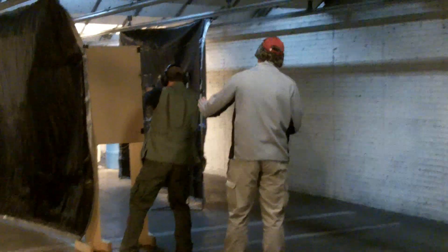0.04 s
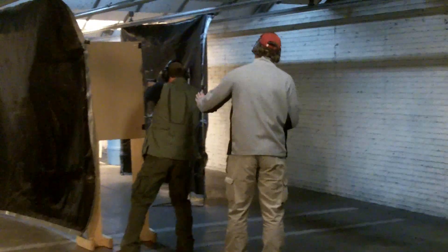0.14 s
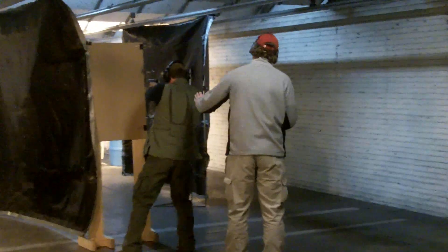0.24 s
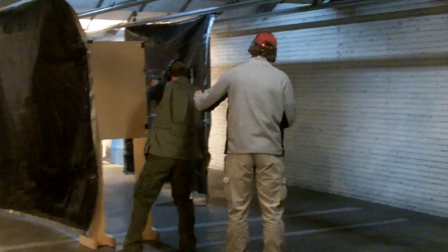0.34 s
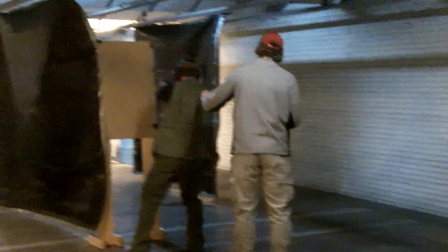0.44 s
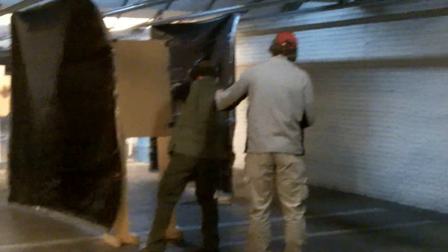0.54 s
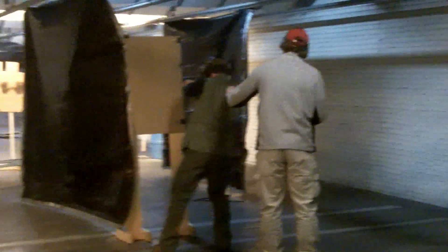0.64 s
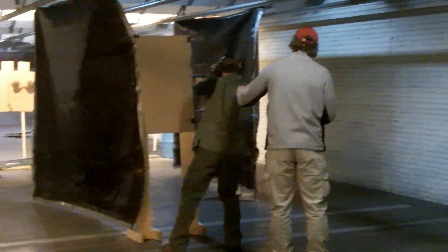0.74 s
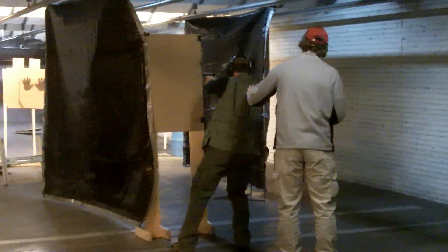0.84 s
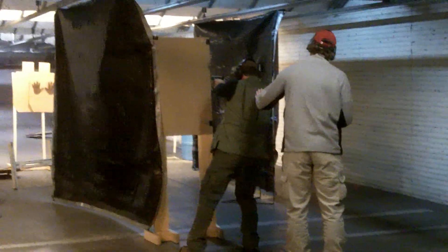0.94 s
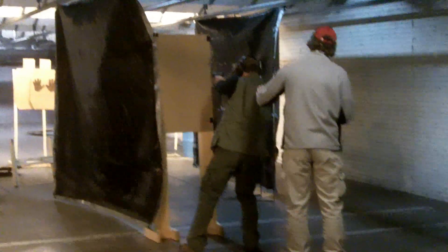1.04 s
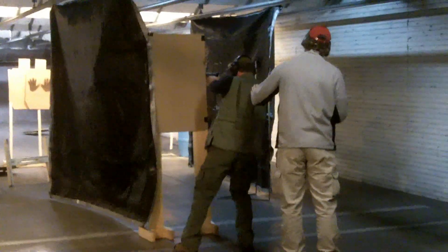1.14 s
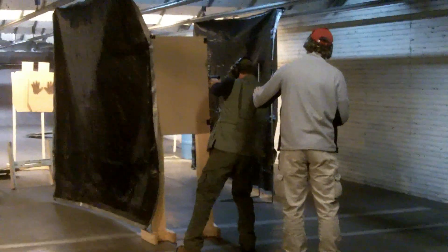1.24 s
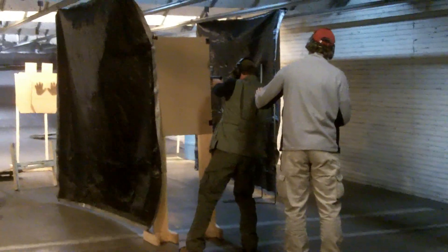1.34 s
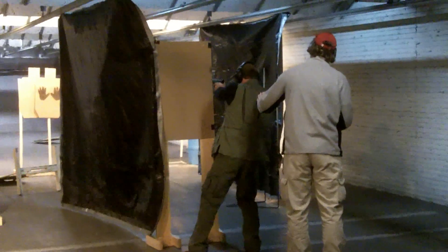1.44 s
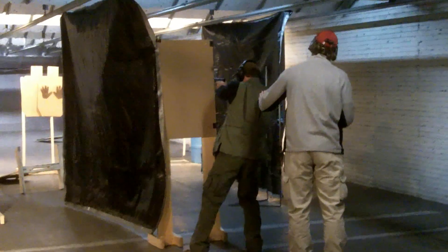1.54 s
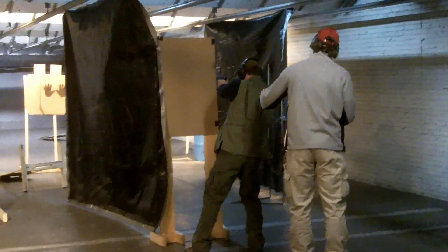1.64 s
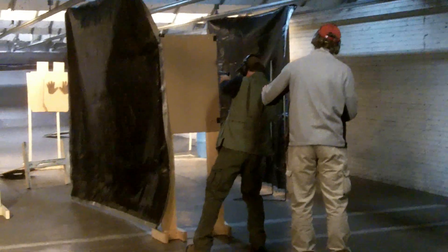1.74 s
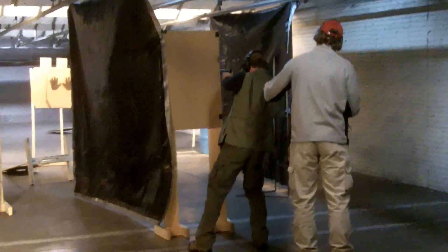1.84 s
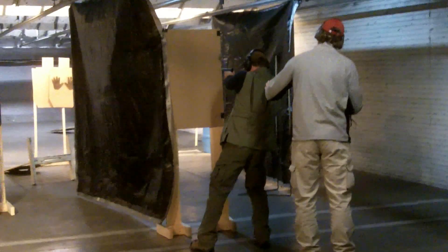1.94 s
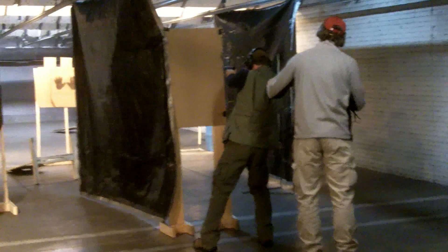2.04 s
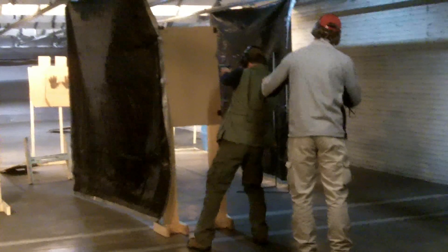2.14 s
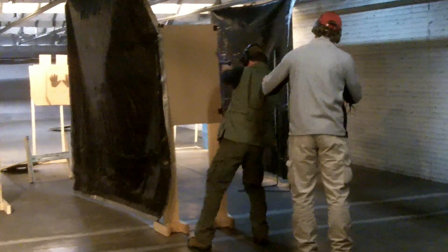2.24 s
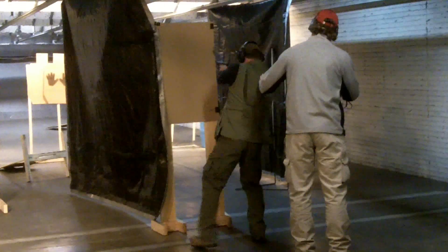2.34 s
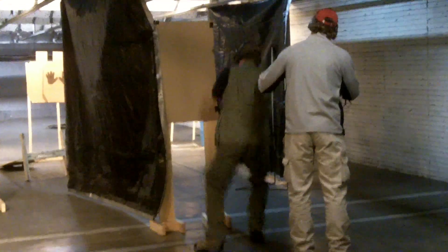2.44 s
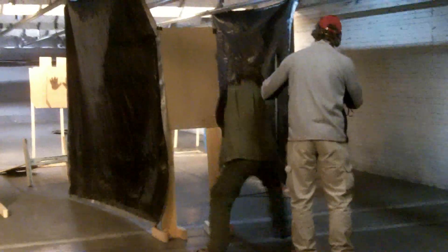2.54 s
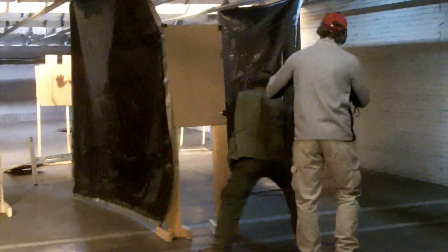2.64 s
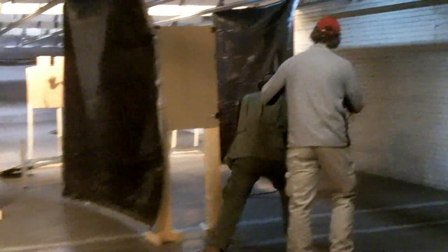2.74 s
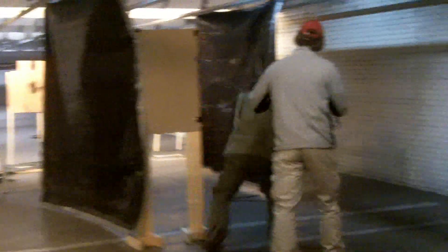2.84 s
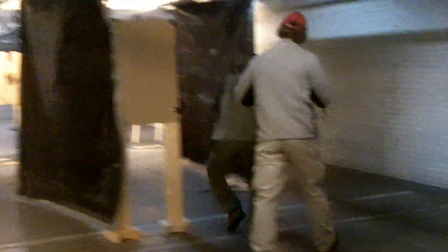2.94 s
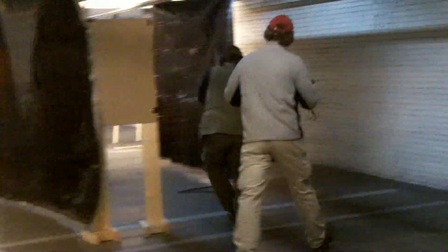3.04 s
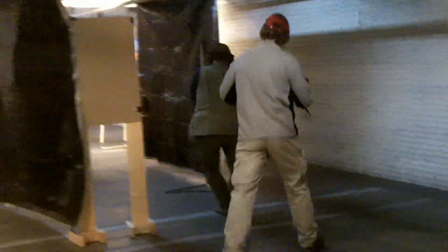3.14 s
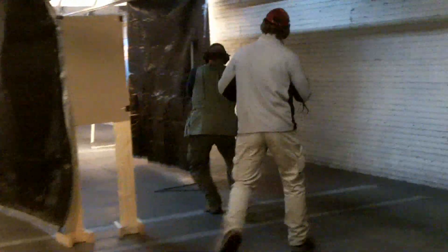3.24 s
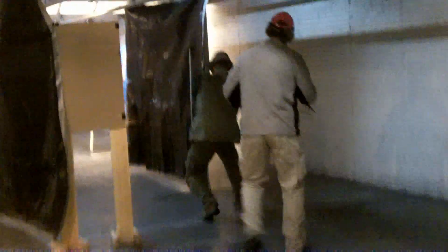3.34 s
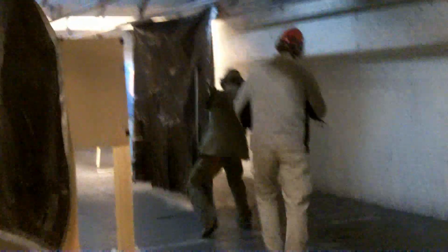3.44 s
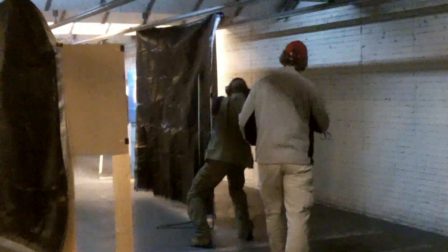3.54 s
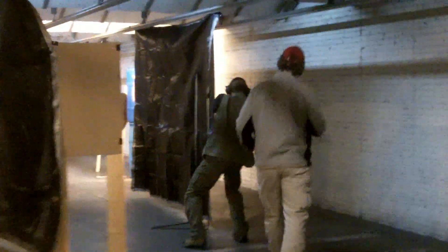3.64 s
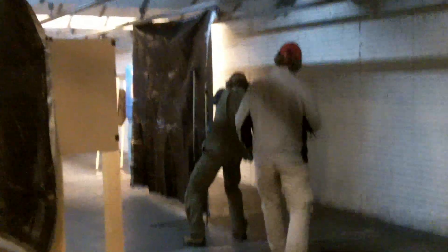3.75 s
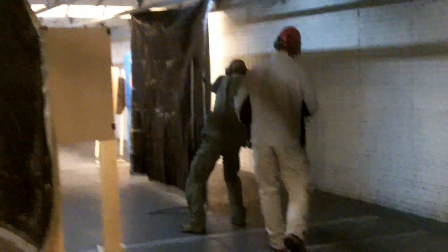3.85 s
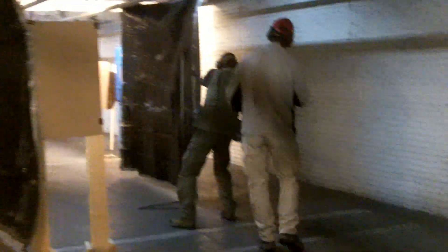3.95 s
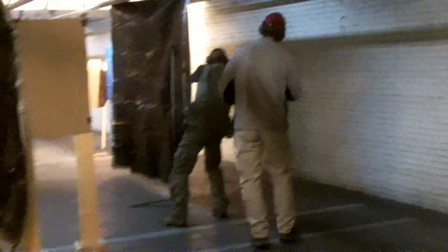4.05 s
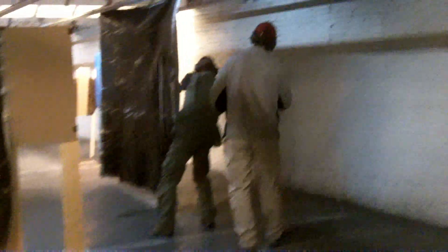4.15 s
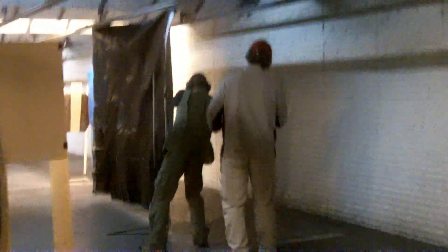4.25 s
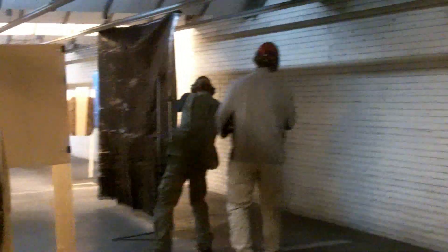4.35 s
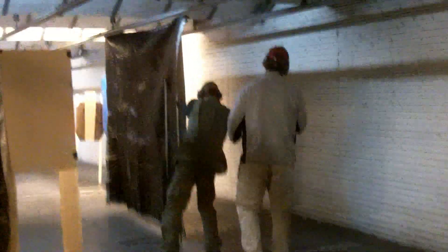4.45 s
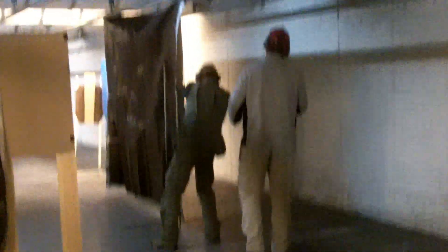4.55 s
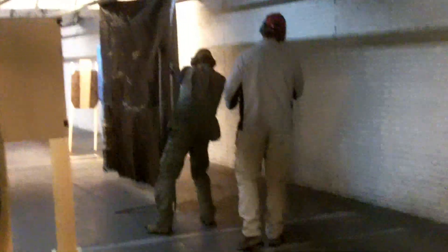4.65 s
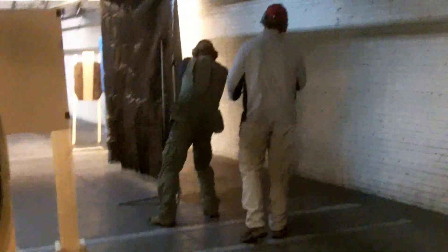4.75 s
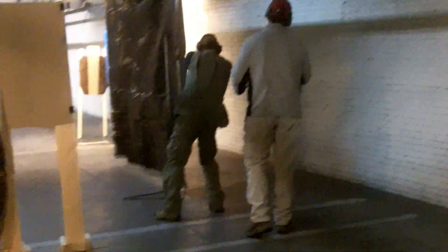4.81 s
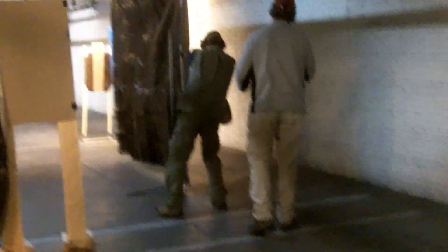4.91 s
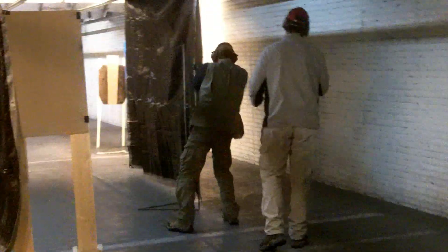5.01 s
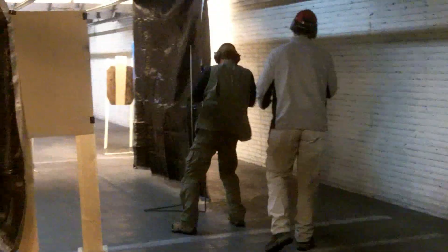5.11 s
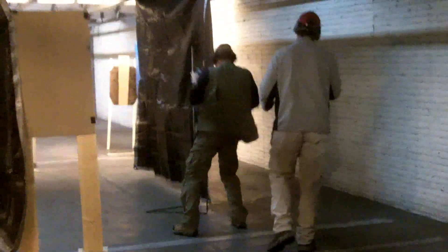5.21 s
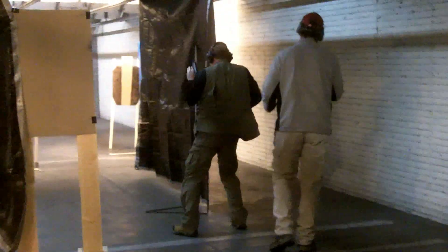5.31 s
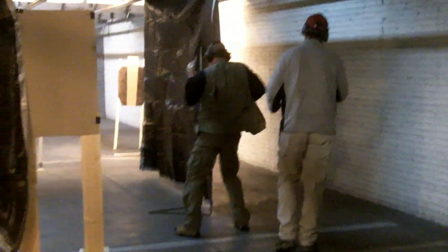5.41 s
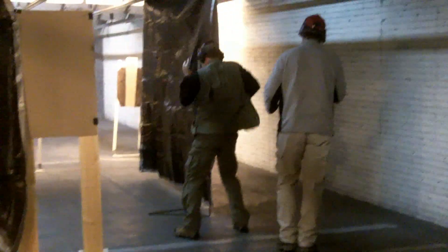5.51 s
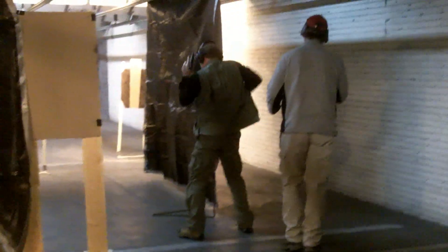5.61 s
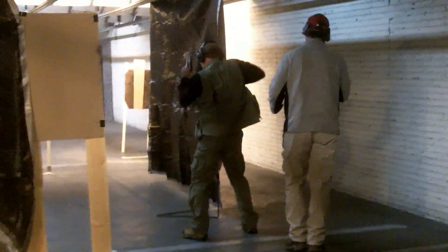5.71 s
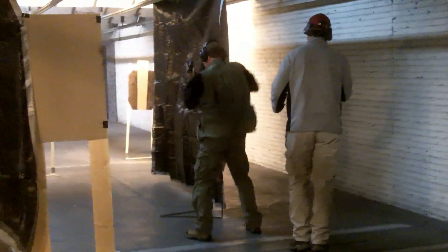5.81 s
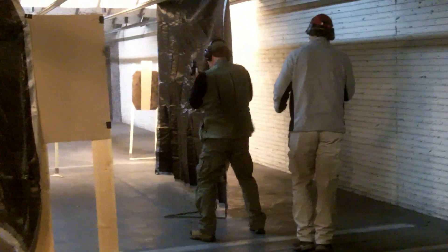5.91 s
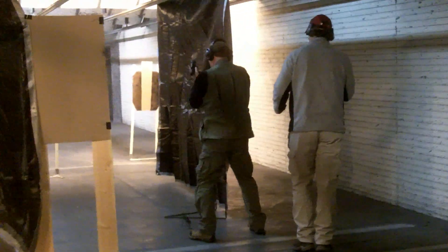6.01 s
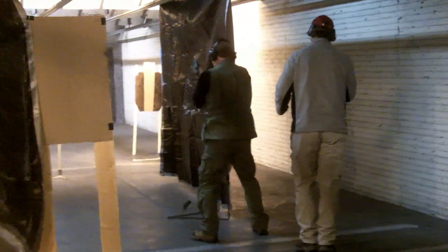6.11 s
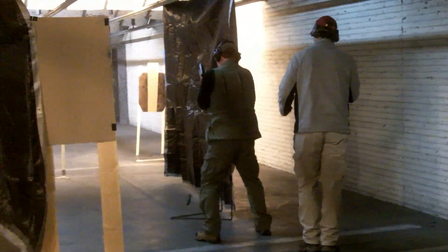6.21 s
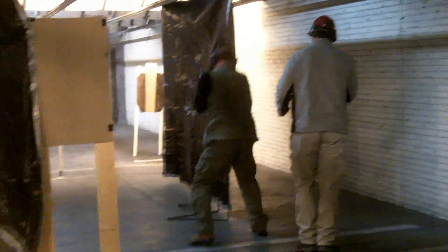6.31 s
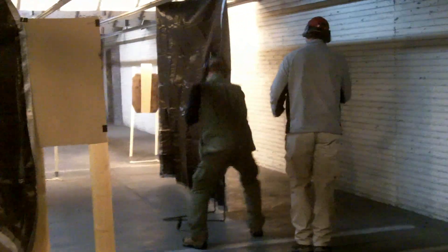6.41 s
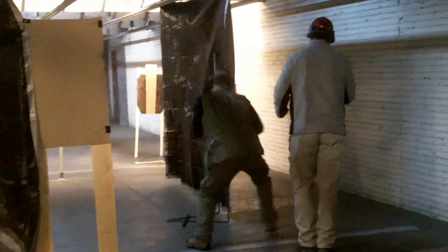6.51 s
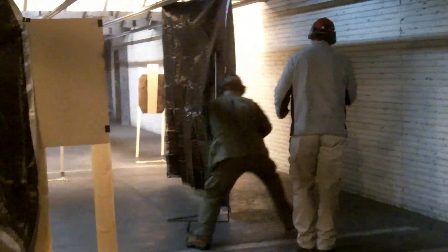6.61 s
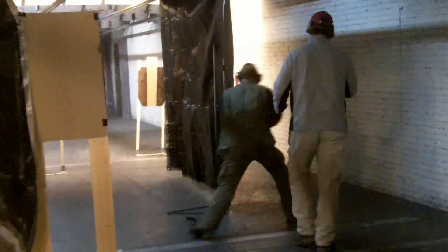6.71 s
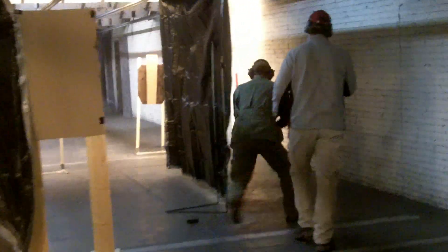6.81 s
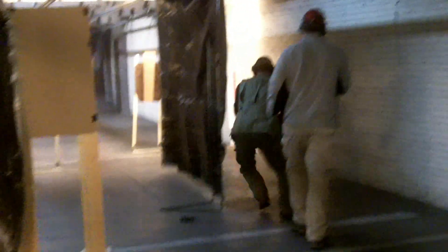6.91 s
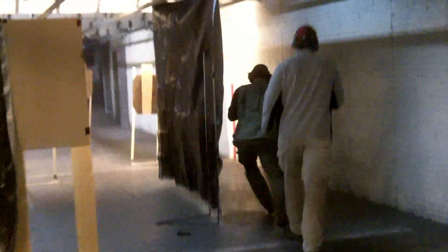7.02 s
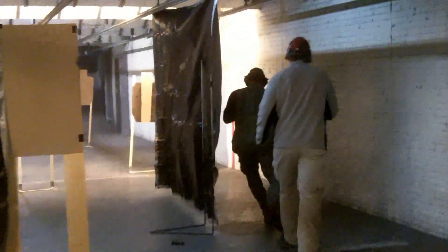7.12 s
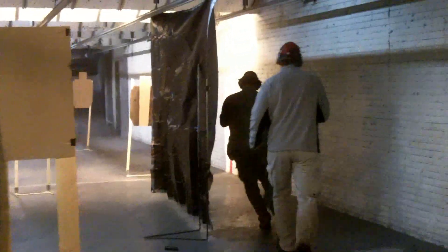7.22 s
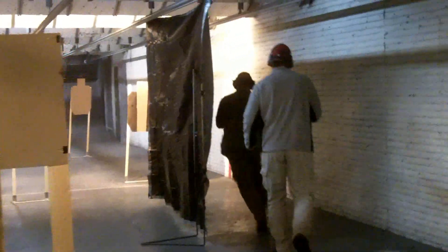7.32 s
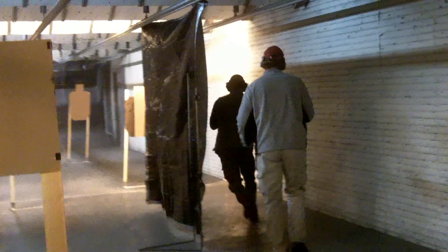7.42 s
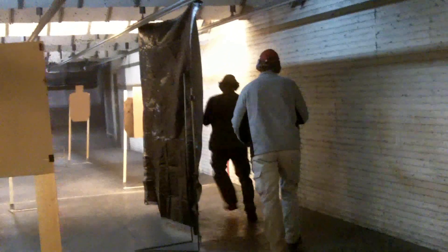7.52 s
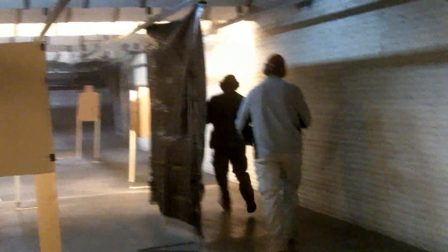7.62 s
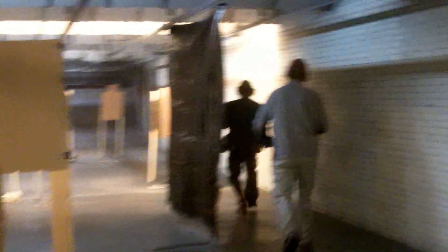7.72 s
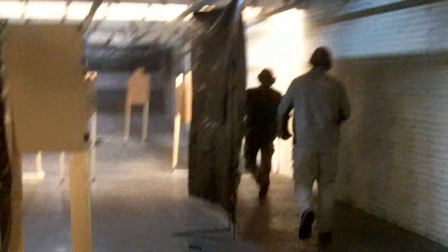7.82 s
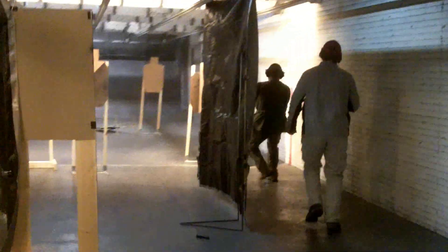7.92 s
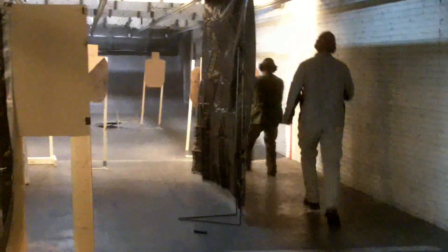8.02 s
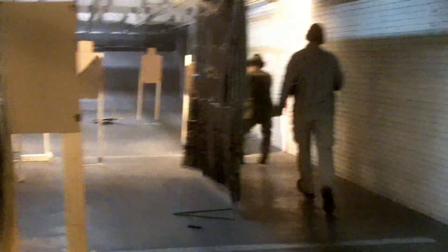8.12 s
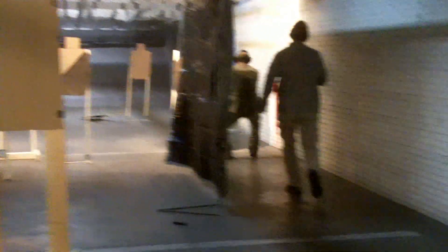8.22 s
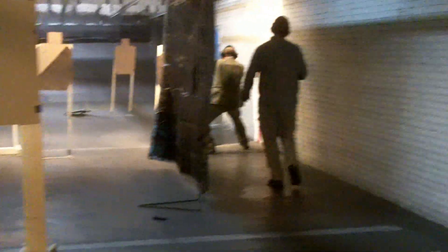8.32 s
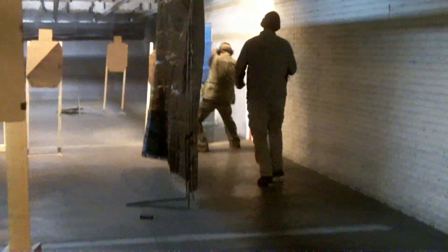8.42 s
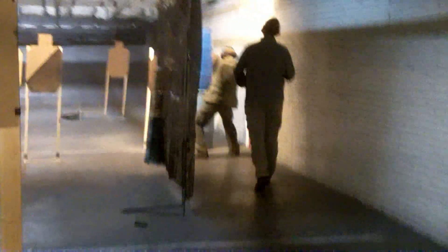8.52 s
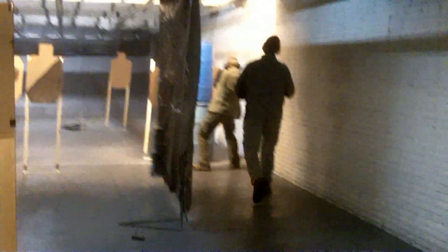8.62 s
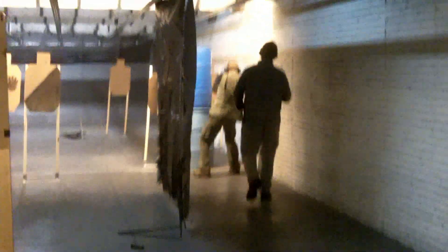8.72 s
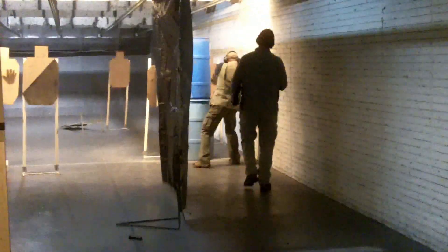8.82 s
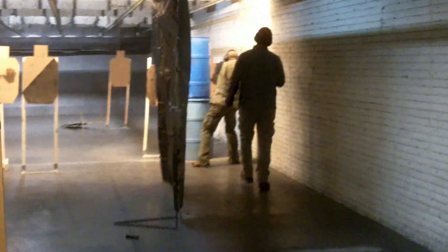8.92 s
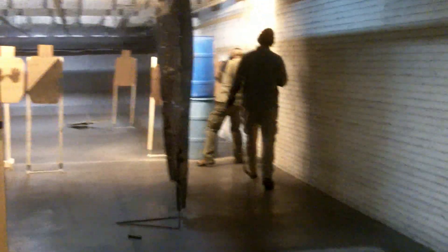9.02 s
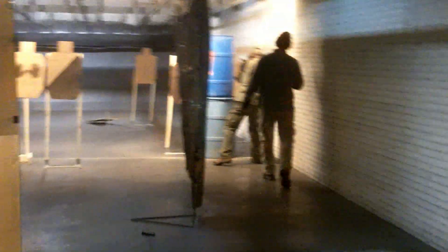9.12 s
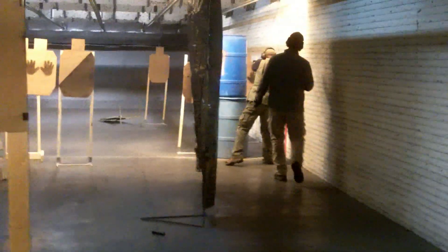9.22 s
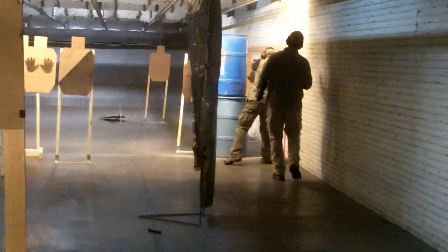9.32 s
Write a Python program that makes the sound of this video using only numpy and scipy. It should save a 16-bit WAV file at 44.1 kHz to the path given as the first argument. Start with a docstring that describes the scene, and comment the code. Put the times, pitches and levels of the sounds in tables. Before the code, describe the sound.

Overloaded pistol blasts in a reverberant hall, brass cases tinkling on concrete, a steel magazine clattering down, footsteps moving off, then a last shot.

```python
"""A pistol fires in a long concrete indoor range, in pairs, a string of three and one last shot at the end.
Each blast is a pressure pulse with echoes and filtered-noise hall decay; the far wall slaps back.
The ventilation is banded noise. Brass cases bounce as noise ticks and paired sines, shoes scuff as noise strokes,
and a magazine dropped in a reload clatters as noise cracks and steel modes. Gain control ducks the loud parts."""
import sys
import numpy as np
from scipy import signal
from scipy.io import wavfile

SR = 44100
rng = np.random.default_rng(int(sys.argv[2]) if len(sys.argv) > 2 else 0)


def master(y):
    """Save y as 16-bit WAV."""
    cut = np.clip(np.atleast_2d(y).T, -1, 1)
    pcm = np.round(cut * 32767)  # scale
    wavfile.write(sys.argv[1], SR, pcm.astype(np.int16))


N = 412776
TIME = np.arange(N) / SR
FAR_WALL_S = .116  # delay of the far-wall slap

# pistol shots: start_s, blast_db, late_tail_db, tilt_db_per_octave (about 1 kHz, hall only)
SHOTS = [(-.052, -2, -0.5, 0.5), (0.498, -3, 0, 1), (1.854, -2.5, 0.5, 1), (2.3678, -1, 0, 0.5),
         (4.332, -1.5, 1, 1), (4.7536, -1, -0.5, 0.5), (5.018, -2, 1.5, 1), (9.2744, -3, -15, 0)]
# hall response, t60 before scaling: freq_hz, early_db_per_hz, early_t60_s, late_db_per_hz, late_t60_s
HALL = [(30, 4.5, 0.68, -9.5, 0.83), (70, 4.5, 0.37, -22, 0.83), (143, 1.5, 0.5, -6.5, 3.2),
        (232, 0, 1.04, -5.5, 2.88), (455, 1, 1.12, -13.5, 2.81), (830, 3, 0.98, -12.5, 2.48),
        (1565, -4.5, 0.91, -17.5, 2.11), (3200, -11.5, 0.85, -30.5, 1.81), (5880, -14, 0.59, -42, 1.6),
        (8730, -25, 0.36, -69.5, 1.27), (15000, -25.5, 0.3, -68.5, .8)]


def from_db(db):
    """Decibels to amplitude gain."""
    return 10 ** (np.asarray(db) / 20)


def rms_one(x):
    """Scale to unit rms."""
    return x / np.sqrt(np.mean(x ** 2) + 1e-20)


def at_hz(rows, hz):
    """Table columns at one frequency, interpolated over log frequency."""
    freqs, *columns = np.transpose(rows)
    return [np.interp(np.log(hz), np.log(freqs), column) for column in columns]


def butter(x, hz, kind, order=2):
    """Butterworth filter."""
    sos = signal.butter(order, np.clip(hz, 10, .45 * SR), kind, fs=SR, output="sos")
    return signal.sosfilt(sos, x)


def add(out, start_s, sound):
    """Mix a sound in at a time; one that starts outside the scene is skipped."""
    i = int(round(start_s * SR))
    if 0 <= i < N:
        out[i:i + len(sound)] += sound[:N - i]


def noise_bands(size):
    """Half-octave noise bands of equal density: (centre_hz, samples)."""
    white = rng.standard_normal((2, size + SR // 4))  # neighbouring bands use different sources
    edges_hz = np.geomspace(20, 17000, 21)
    for k, (low, high) in enumerate(zip(edges_hz, edges_hz[1:])):
        band = butter(white[k % 2], [low, high], "band", order=3)
        yield np.sqrt(low * high), band[-size:]  # filter onset dropped


def dying(t, t60_s):
    """Exponential decay from t = 0, 60 dB per t60."""
    return (t >= 0) * np.exp(-np.log(1000) * np.maximum(t, 0) / t60_s)


def hall_roar(level_db=8.5, build_s=0.013, first_share=0.54, bass_lag_hz=900, hold_s=0.029,
              slap_db=-2.5, slap_t60_s=0.23, late_t60_share=.86, flutter_db=1.0):
    """Reflections pile up, die fast near the firing line and linger down the hall; the far wall slaps brightly."""
    t, out = TIME[::20], np.zeros(N)
    for hz, noise in noise_bands(N):
        early_db, early_t60_s, late_db, late_t60_s = at_hz(HALL, hz)
        hold = hold_s / (1 + hz / 9000)
        # the crack leads, the body swells behind it
        first = first_share * (hz + bass_lag_hz / 2) / (hz + bass_lag_hz)
        power = 0
        for start_s, blast_db, tail_db, tilt_db in SHOTS:
            age = t - start_s
            build = (age >= 0) * (1 - (1 - first) * np.exp(-np.maximum(age, 0) / build_s))
            near_gain = from_db(early_db + blast_db + tilt_db * np.log2(hz / 1000))
            near = near_gain * build * dying(np.maximum(age - hold, 0), early_t60_s)
            wall_loss_db = 60 * (FAR_WALL_S - hold) / early_t60_s
            slap_gain = from_db(early_db + blast_db + slap_db - wall_loss_db)
            slap = slap_gain * dying(age - FAR_WALL_S, slap_t60_s)
            late = from_db(late_db + tail_db) * build * dying(age, late_t60_share * late_t60_s)
            power = power + near ** 2 + slap ** 2 * (1 + hz / 2500) + late ** 2
        # envelope grid is SR / 20, so the cutoff is really 41 Hz
        flutter = rms_one(butter(rng.standard_normal(len(t)), 820, "low"))
        envelope = np.sqrt(power) * from_db(flutter_db * flutter)
        out += noise * np.interp(TIME, t, envelope)
    return from_db(level_db) * out


def muzzle(level_db=-4.0, pulse_s=.0011, echo_db=-5.5, echo_t60_s=0.22, count=14,
           slap_db=-4.0, slap_spread_s=0.0048):
    """N-shaped pressure pulse, its echoes from floor, side wall and beams, and a sharp far-wall crack."""
    out, pulse = np.zeros(N), np.linspace(1, -1, int(pulse_s * SR))
    crack = butter(pulse, 2500, "high")
    for start_s, blast_db, _, _ in SHOTS:
        add(out, start_s, from_db(level_db + blast_db) * pulse)
        for delay_s in rng.uniform(0.0026, 0.027, count):
            echo_gain = from_db(level_db + blast_db + echo_db) * dying(delay_s, echo_t60_s)
            add(out, start_s + delay_s, echo_gain * pulse)
        for delay_s in FAR_WALL_S + rng.exponential(slap_spread_s, size=4):
            add(out, start_s + delay_s, from_db(slap_db + blast_db) * crack)
    return out


def ventilation(level_db=-28.5, air_db=-6.0, rumble_db=-37, rumble_rise_db_per_s=0.57, split_hz=110):
    """Air rushes through ducts that boom at a few pitches, over a deep rumble that grows downrange."""
    # air spectrum, relative: freq_hz, level_db_per_hz
    air_rows = [(25, 4.5), (45, 6.5), (70, -4.5), (110, -5.5), (150, -10), (230, -4), (310, -27),
                (450, -27), (800, -34), (1600, -35), (3200, -45), (6000, -50.5), (9000, -64.5),
                (15000, -75)]
    # duct resonances: centre_hz, width_hz, level_db (re level_db above)
    duct_rows = [(102.2, 8.9, -10.5), (223.6, 23.3, -3.5), (767, 32, -30)]
    flow = sum(noise * from_db(at_hz(air_rows, hz)[0]) for hz, noise in noise_bands(N))
    air = from_db(air_db) * rms_one(butter(flow, split_hz, "high", order=4))
    deep = rms_one(butter(flow, split_hz, "low", order=4))
    boom = np.zeros(N)
    for hz, width_hz, duct_db in duct_rows:
        resonance = butter(rng.standard_normal(N), [hz - width_hz / 2, hz + width_hz / 2], "band")
        boom += from_db(duct_db) * rms_one(resonance)
    rumble = from_db(rumble_db + rumble_rise_db_per_s * TIME) * deep
    return from_db(level_db) * (air + boom) + rumble


def bounces(count=4, hop_share=.58, tick_loss_db=8.5, ring_loss_db=5.5):
    """Each case hops on, every hop shorter and weaker: (start_s, tick_db, ring_db, ring_hz)."""
    # brass cases landing, levels relative: start_s, tick_db, ring_db, nominal_ring_hz, first_hop_s
    case_rows = [(1.21, -19.5, -63, 10950, .277), (1.716, -14.5, -56.5, 11950, .25),
                 (3.0917, -35, -50, 10880, .397), (3.152, -19, -62, 10850, .364),
                 (3.8113, -25, -49, 10730, .11), (3.8696, -20.5, -57, 11000, 0.29),
                 (5.462, -45, -57, 10630, .24), (5.96, -11.5, -54, 9970, .54),
                 (6.128, -23.5, -44, 10560, .444), (6.727, -21, -62, 10170, .223),
                 (6.95, -25, -44.5, 10000, .191)]
    for start_s, tick_db, ring_db, ring_hz, hop_s in case_rows:
        for k in range(count):
            yield start_s, tick_db - k * tick_loss_db, ring_db - k * ring_loss_db, ring_hz
            start_s += hop_s * hop_share ** k


def cases(tick_offset_db=-5.0, tick_t60_s=0.016, skitter_db=-18.5, skitter_t60_s=0.24,
          low_hz=4500, high_hz=6200, ring_t60_s=0.36, split_hz=45):
    """A bounce ticks, skitters on grit and rings the out-of-round case mouth as a close pair of modes."""
    out, t = np.zeros(N), TIME[:SR // 2]
    for start_s, tick_db, ring_db, ring_hz in bounces():
        contact = dying(t, tick_t60_s) + from_db(skitter_db) * dying(t, skitter_t60_s)
        tick = butter(rng.standard_normal(len(t)) * contact, [low_hz, high_hz], "band")
        pair_hz = ring_hz + split_hz * rng.standard_normal(2)
        ring = sum(np.sin(2 * np.pi * hz * t) for hz in pair_hz) * dying(t, ring_t60_s)
        add(out, start_s, from_db(tick_db + tick_offset_db) * tick + from_db(ring_db) * ring)
    return out


def scuffs(heel_peak_s=0.0041, heel_hz=1600, sole_after_s=.008, sole_peak_s=0.021, sole_hz=2270):
    """Dull heel then gritty sole per step, plus stance slides: (start_s, level_db, peak_s, pitch_hz)."""
    # steps downrange: start_s, heel_db, sole_db
    step_rows = [(7.644, -46.5, -62), (7.884, -45, -47.5), (8.076, -36, -47.5), (8.44, -61, -63),
                 (8.79, -49, -55), (9.15, -48, -57)]
    # shoe slides: start_s, level_db, time_to_peak_s, band_reference_hz
    slide_rows = [(3.685, -46, 0.038, 3600), (4.05, -66, .15, 5000), (7.375, -47.5, 0.033, 4700),
                  (7.688, -50, 0.012, 5160), (9.158, -54.5, .014, 5000)]
    for start_s, heel_db, sole_db in step_rows:
        yield start_s, heel_db, heel_peak_s, heel_hz
        yield start_s + sole_after_s, sole_db, sole_peak_s, sole_hz
    yield from slide_rows


def shoes(grit_db=4.5, spread_below=4.0, spread_above=1.33):
    """Soles drag grit over concrete: uneven band noise under a smooth stroke."""
    out, t = np.zeros(N), TIME[:SR // 2]
    for start_s, level_db, peak_s, hz in scuffs():
        grit = rng.standard_normal(len(t)) * from_db(grit_db * rng.uniform(-0.91, 1, len(t)))
        scrape = rms_one(butter(grit, [hz / spread_below, hz * spread_above], "band"))
        stroke = (t / peak_s) ** 2 * np.exp(2 * (1 - t / peak_s))  # unit peak at peak_s
        add(out, start_s, from_db(level_db) * stroke * scrape)
    return out


def contacts(corner_db=-9.5):
    """The magazine touches with a corner, then falls flat: (start_s, level_db, body_hz, body_width)."""
    # knocks, level relative: corner_start_s, flat_after_s, level_db, body_hz, body_width (share)
    knock_rows = [(6.189, .009, -14.5, 3250, 0.39), (6.357, .0235, -15, 1710, 0.094),
                  (6.63, .003, -21, 2150, .12), (6.825, 0.0044, -22.5, 1700, 0.72),
                  (7.012, .003, -20.5, 1420, 0.89), (7.235, .003, -34.5, 2230, 0.021)]
    for start_s, flat_after_s, level_db, body_hz, body_width in knock_rows:
        yield start_s, level_db + corner_db, body_hz, body_width
        yield start_s + flat_after_s, level_db, body_hz, body_width


def magazine(crack_db=-2.5, crack_t60_s=0.23, low_hz=1900, high_hz=6500, ring_db=-15.0, body_db=-3.5,
             body_t60_s=0.081, dull_hz=10500, rattle_db=5.0, snap_db=6.0, snap_t60_s=0.0094):
    """Each knock: hard snap, rattling crack, damped hollow note set by where it lands, and steel ring."""
    # steel modes before random scatter: freq_hz, relative_db, t60_s
    modes = [(1040, -20, 0.4), (1700, -21, .3), (2186, -35, 0.23), (2290, -13, 1.4), (2720, -39, 0.27),
             (3340, -17, 0.5), (3780, -8, .2), (5000, -24, 0.9), (5970, -21.5, 0.12), (6440, -21, .2),
             (7000, -15, 0.2), (7960, -26, 0.33), (12600, -23, .2)]
    out, t = np.zeros(N), TIME[:SR]
    for start_s, level_db, body_hz, body_width in contacts():
        chatter = rms_one(butter(rng.standard_normal(len(t)), 190, "low"))  # spring and follower
        contact = rng.standard_normal(len(t)) * from_db(rattle_db * chatter)
        decay = dying(t, crack_t60_s) + from_db(snap_db) * dying(t, snap_t60_s)
        crack = butter(contact * decay, [low_hz, high_hz], "band")
        body_band_hz = [body_hz / (1 + body_width), body_hz * (1 + body_width)]
        body = rms_one(butter(contact, body_band_hz, "band")) * dying(t, body_t60_s)
        ring = np.zeros(len(t))
        for hz, mode_db, t60_s in modes:
            mode_gain = from_db(mode_db + rng.normal(0, 6.6))
            ring += mode_gain * np.sin(2 * np.pi * hz * rng.normal(1, 0.00345) * t) * dying(t, t60_s)
        add(out, start_s, from_db(level_db + crack_db) * crack
            + from_db(level_db + ring_db) * ring + from_db(level_db + body_db) * body)
    return butter(out, dull_hz, "low")


def in_hall(x, wet_db, t60_share):
    """Add reverberation: convolution with noise bands that die at a share of the hall's early t60."""
    t = TIME[:2 * SR]
    response = sum(noise * dying(t, t60_share * at_hz(HALL, hz)[1]) for hz, noise in noise_bands(len(t)))
    return x + from_db(wet_db) * signal.fftconvolve(x, response / np.linalg.norm(response))[:N]


def gain_control(x, threshold_db=-23.0, depth_db=11.5, release_db_per_s=11.5, detect_s=0.0072):
    """High level cuts the gain within milliseconds; as it creeps back the ventilation swells again."""
    r = np.exp(-1 / (detect_s * SR))
    power = signal.lfilter([1 - r], [1, -r], x ** 2)
    over_db = np.clip(10 * np.log10(power + 1e-18) - threshold_db, 0, depth_db)
    # peak hold with a linear dB release
    release_db = release_db_per_s * TIME
    held_db = np.maximum.accumulate(over_db + release_db, axis=-1) - release_db
    return x * from_db(-butter(held_db, 60, "low", order=1))


def scene(shots_db=12.0):
    """Mono mix of shots, small sounds and air; the magazine has less but longer reverberation."""
    shots = from_db(shots_db) * (hall_roar() + muzzle())
    small = in_hall(cases() + shoes(), wet_db=-1.0, t60_share=0.86)
    reload = in_hall(magazine(), wet_db=-4.5, t60_share=1.42)
    return (shots + ventilation() + small + reload)[None]


def record(dry, overload=1.3, notch_hz=4250, notch_q=1.25, peak_hz=6050, peak_q=3.0, peak_gain=1.95,
           cutoff_hz=15400):
    """Gain ducks, preamplifier overloads, notch and peak colour the treble, converter clips, top is cut."""
    x = overload * np.tanh(gain_control(dry) / overload)
    x = signal.lfilter(*signal.iirnotch(notch_hz, notch_q, SR), x)
    x = x + peak_gain * signal.lfilter(*signal.iirpeak(peak_hz, peak_q, SR), x)
    top_cut = signal.ellip(10, .1, 70, cutoff_hz, fs=SR, output="sos")
    return signal.sosfilt(top_cut, np.clip(x, -1, 1))


dry = scene()
out = record(dry)
master(out)
```